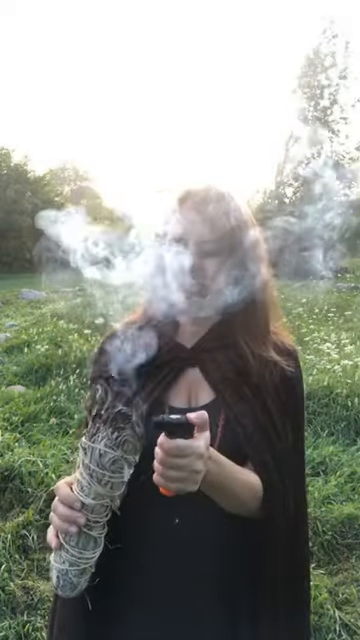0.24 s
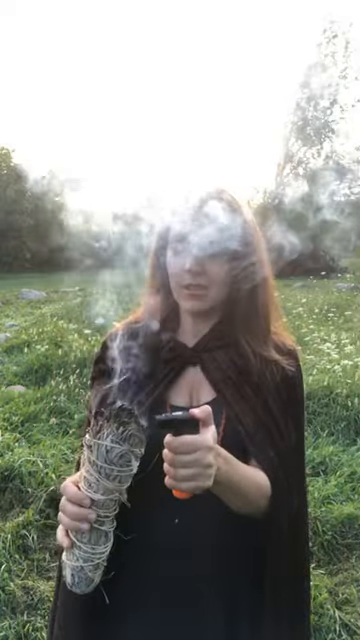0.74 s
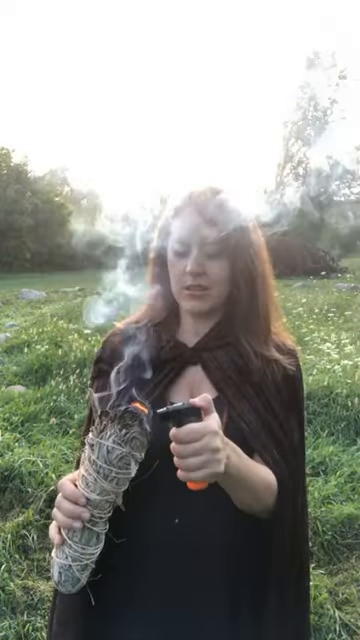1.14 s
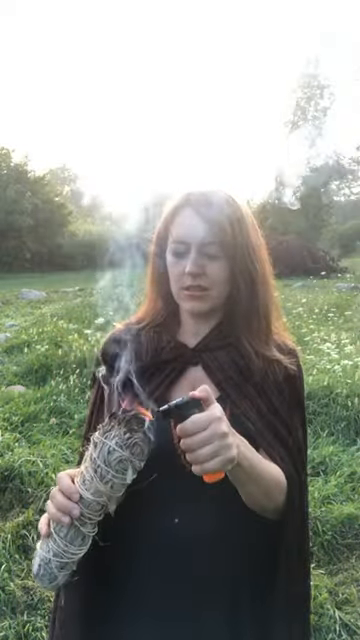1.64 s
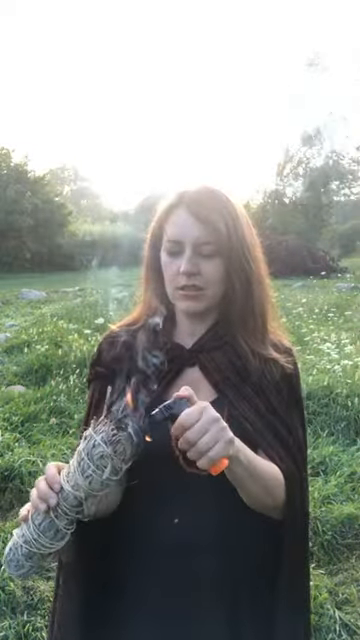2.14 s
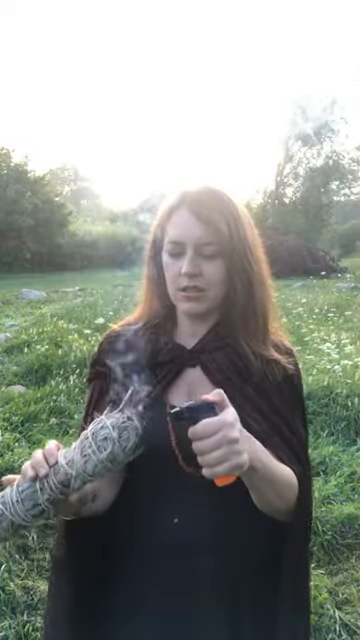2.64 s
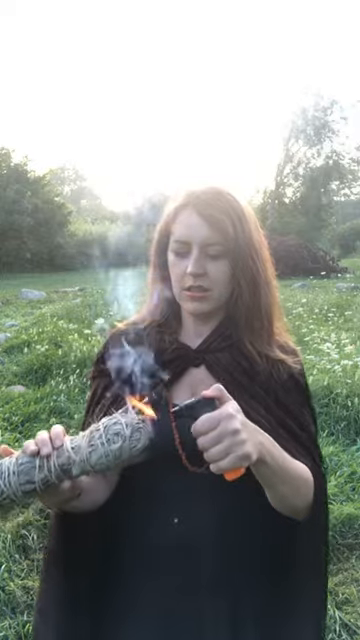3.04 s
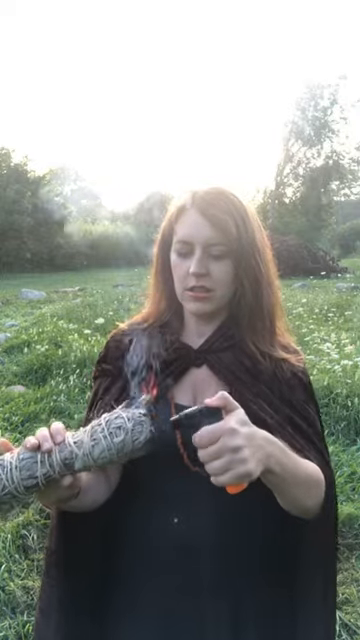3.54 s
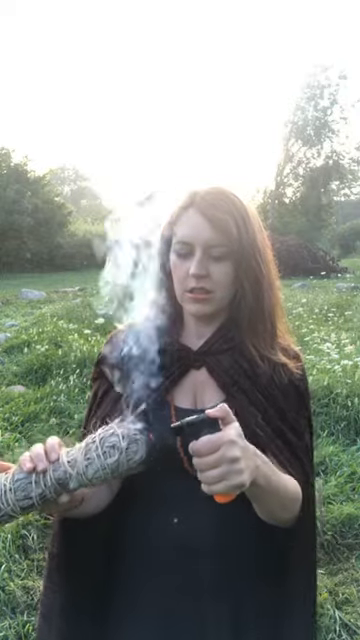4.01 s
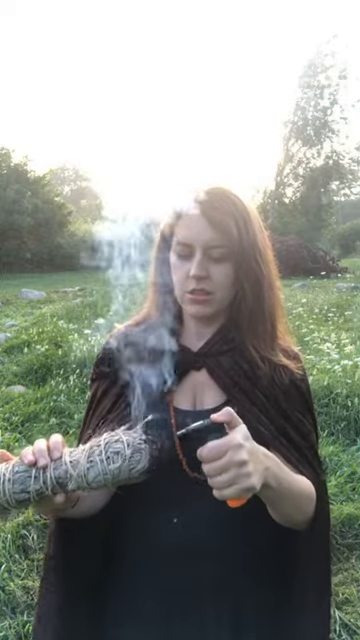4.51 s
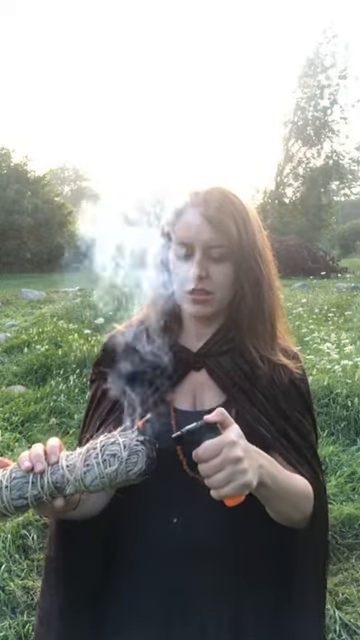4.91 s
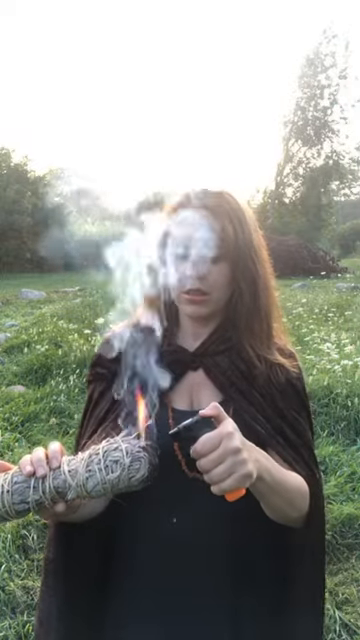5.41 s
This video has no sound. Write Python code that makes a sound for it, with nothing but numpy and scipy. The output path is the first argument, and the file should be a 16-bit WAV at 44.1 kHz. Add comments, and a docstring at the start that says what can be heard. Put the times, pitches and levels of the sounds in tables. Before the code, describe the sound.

In an open meadow, about a metre from a phone microphone, faint gas hisses and a bird chips. A sharp metallic click and tiny pop light a torch, which then roars softly and hisses unsteadily over dry herbs. Stalks crackle briefly; later the bird slurs, whistles and warbles over low distant rumble.

```python
"""A torch lighter is lit in a meadow and held to dried herbs, about a metre from a phone.
A small songbird chips in the trees and unlit gas hisses; the piezo striker snaps and the gas catches with a pop.
Then the turbulent jet flame roars softly, as shaped noise, under its hiss, and cracking stalks ring briefly.
Later the bird's gliding tones turn to slurs, whistles, warbles and sweeps, blurred by leaves and trees.
Faint herb ticks and a low rumble of noise with a distant drone run throughout."""
import sys
import numpy as np
from scipy import signal
from scipy.fft import rfft, irfft, next_fast_len
from scipy.io import wavfile
from scipy.ndimage import uniform_filter1d, map_coordinates

SR = 44100
rng = np.random.default_rng(int(sys.argv[2]) if len(sys.argv) > 2 else 0)


def to_wav(sig):
    """Store sig (one row per channel, or 1-D mono) as 16-bit WAV at the path in sys.argv[1].

    Samples outside -1..1 are clipped; the rate is SR.
    """
    pcm = np.clip(np.atleast_2d(sig), -1, 1) * 32767
    pcm = np.round(pcm).astype(np.int16)
    wavfile.write(sys.argv[1], SR, pcm.T)  # frames by channels


N = 249606
LIGHT_S = .084  # the gas catches

# extra travel time of the echoes off the holder's body and off the ground:
# (time [s], body delay [s], ground delay [s])
ECHO_PATHS = [(0, .00157, .00646), (1.3, .00162, .00646), (2.3, .00178, .00642), (3.4, .00155, .00641),
              (4.5, .0016, .00637), (5.6, .0017, .00635)]


def torch(flutter_db=0.93, spit_db=1.0, unlit_db=-59, roar_db=0.73, gas_db=2.0):
    """Gas hisses from the nozzle; once lit, the turbulent flame adds a soft, fluttering roar."""
    # level of the flame's roar, before roar_db: (time [s], level [dB])
    flame_level = [(0.18, -55), (0.28, -53.5), (0.91, -55), (0.94, -54), (1.55, -54.5), (1.72, -52),
                   (2.11, -55), (4.26, -54), (5.64, -55.5)]
    # level of the gas, before gas_db, an unsteady hiss with a deep dip near 2 s:
    # (time [s], level [dB])
    gas_level = [(0.18, -66), (0.8, -64), (0.94, -66), (1.15, -61.5), (1.32, -60.5), (1.38, -66),
                 (1.59, -66), (1.62, -60.5), (2.06, -74.5), (2.2, -64), (2.57, -57.5), (2.75, -60),
                 (3.86, -58.5), (4.0, -62), (4.03, -59), (4.21, -60), (4.41, -57.5), (4.44, -60),
                 (4.88, -58), (5.02, -63), (5.12, -58.5), (5.41, -60), (5.47, -58), (5.64, -61)]
    # strength of the nozzle's resonance against the hiss, as the torch is turned: (time [s], level [dB])
    nozzle_aim = [(0, -17), (.9, -17), (1.3, -16), (1.7, -21), (2.05, -15), (2.35, -26), (2.65, -14),
                  (3.1, -10.5), (3.5, -15), (3.8, -17), (4.2, -12.5), (5.0, -12), (5.6, -13.5)]
    # spectra of the flame, the burning jet's gas and the unlit gas: (frequency [Hz], density [dB])
    roar_spectrum = [(250, -12.5), (480, -9.5), (640, -2), (790, -0.5), (950, -4.5), (1100, -0.5),
                     (1600, -0.5), (2300, -5), (3100, -10.5), (3800, -10), (5500, -17.5), (7400, -18.5),
                     (9000, -27)]
    hiss_spectrum = [(3500, -8), (5000, -9), (6500, -7), (7600, -7.5), (8900, -16), (10200, -15),
                     (11100, -7.5), (12200, -5.5), (13400, 0.5), (14900, 2.5), (15700, -5)]
    unlit_spectrum = [(4000, -19), (6000, -8), (7100, -5), (8800, -14), (10000, -12), (10800, -3),
                      (11800, -4), (13500, -11), (15500, -13)]

    catch_s = 0.0092
    lit = np.clip((np.arange(N) / SR - LIGHT_S) / catch_s, 0, 1)
    roar_gain = undb(curve(flame_level) + roar_db + flutter_db * walk(35))
    roar = noise(roar_spectrum) * roar_gain
    nozzle = narrow_noise(hz=9570, width_hz=600)
    gas = noise(hiss_spectrum) + undb(curve(nozzle_aim)) * nozzle
    gas = gas * undb(curve(gas_level) + gas_db + spit_db * walk(40))
    unlit = undb(unlit_db) * noise(unlit_spectrum)
    return lit * (roar + gas) + (1 - lit) * unlit


def ignition(db=-38, start_hz=480, end_hz=85, fall_s=0.0048, t60=0.15):
    """The first gas catches with a tiny pop that drops in pitch as the flame swells."""
    t, out = seconds(.15), np.zeros(N)
    hz = end_hz + (start_hz - end_hz) * np.exp(-t / fall_s)
    pop = np.sin(2 * np.pi * np.cumsum(hz) / SR)
    add(out, LIGHT_S, undb(db) * fade(t, t60) * pop)
    return out


def striker(ring_db=-29, scatter_db=-31, scatter_t60=0.068, late_db=-51, late_t60=0.47):
    """The hammer hits the crystal; the head rings and the meadow scatters the snap."""
    # the piezo hammer lands and rebounds: (time [s], relative level [dB], 60 dB decay [s])
    hammer_blows = [(0.0812, -8.5, 0.0041), (0.082, -19, 0.0073)]
    # ring of the lighter's head: (frequency [Hz], relative level [dB], 60 dB decay [s])
    head_modes = [(4770, -4, .025), (5100, 0, .012), (6400, -11, .035), (6500, 10, 0.018), (8300, -3, .03),
                  (9640, 1, .035), (9750, 6, 0.027), (10100, -3, .035), (11200, -4, .025),
                  (11950, -4, .035), (12680, -4, .03), (14150, -2, .02)]
    # colour of a blow, and of its scatter from the grass: (frequency [Hz], relative level [dB])
    snap_spectrum = [(400, -45), (1600, -30), (2300, -7.5), (3600, -3), (4900, 4.5), (5700, -1.5),
                     (6700, 2.5), (8200, -6), (9750, 6), (10900, -3.5), (12400, 2.5), (13400, -7),
                     (14200, 5), (15500, -7)]
    scatter_spectrum = [(500, -5), (2500, -12), (4500, -2.5), (7000, 2), (10000, 4.5), (13000, 3),
                        (16000, -24)]

    lead_s = .003  # each burst begins this long before its peak
    t = seconds(.1)
    blows, rings, ring = np.zeros(N), np.zeros(N), np.zeros(len(t))
    for hz, db, t60 in head_modes:
        ring += undb(db) * fade(t, t60) * np.sin(2 * np.pi * (hz * t + rng.random()))
    for s, db, t60 in hammer_blows:
        add(blows, s - lead_s, undb(db) * burst(t60, lead_s))
        add(rings, s, undb(db + ring_db) * ring)
    # the scatter starts one ground-echo delay after the last blow
    since = np.arange(N) / SR - hammer_blows[-1][0] - ECHO_PATHS[0][2]
    tail = undb(scatter_db) * fade(since, scatter_t60) + undb(late_db) * fade(since, late_t60)
    return 2 * colour(blows, snap_spectrum) + rings + tail * noise(scatter_spectrum)


def burst(t60, lead_s, smooth_hz=300, rise_s=0.0004):
    """A rattle of contacts with an evened spectrum: it peaks about lead_s in, then decays."""
    t = seconds(.1) - lead_s
    rattle = rng.choice([-1., 1.], len(t)) * fade(t, t60)
    spectrum = rfft(rattle)
    power = uniform_filter1d(np.abs(spectrum) ** 2, int(smooth_hz * len(t) / SR))
    evened = irfft(spectrum * np.sqrt(power.mean() / power))
    return evened * np.clip(1 + t / rise_s, 0, 1)


def herbs(rate=14, tick_db=-57, spread_db=3, t60=0.0034):
    """Dry stalks crack in the flame, among faint random ticks of leaf, on average rate per second."""
    # stalks that crack in the heat: (time [s], relative level [dB], pitch [Hz])
    stalk_cracks = [(0.467, -49, 10000), (1.178, -46, 10500), (1.999, -56, 4500), (3.2868, -55, 9000),
                    (3.4938, -57, 9000), (3.542, -38.3, 6500)]

    t, out = seconds(.02), np.zeros(N)
    for s, db, hz in stalk_cracks:
        crack = rng.choice([-1., 1.], len(t)) * fade(t, t60)
        add(out, s, 2 * undb(db) * resonate(crack, hz, width_hz=7400))
    tick_gain = undb(tick_db + spread_db * np.minimum(rng.exponential(size=N), 4))
    ticks = (rng.random(N) < rate / SR) * tick_gain
    return out + colour(ticks, [(1500, -2), (4000, 9), (8000, 11), (14000, -3)])


def reflections(x, body_db=-15, ground_db=-16, tremor_s=4e-5):
    """Body and ground each return a weak copy, a slightly hollow colour; the hand trembles."""
    body_s = curve(ECHO_PATHS, axis=1) + tremor_s * walk(6)
    ground_s = curve(ECHO_PATHS, axis=2) + tremor_s * walk(6)
    return x + undb(body_db) * delayed(x, body_s) + undb(ground_db) * delayed(x, ground_s)


def delayed(x, lag_s):
    """The sound as it arrives over a longer, slowly changing path."""
    return map_coordinates(x, [np.arange(N) - lag_s * SR], order=3)


def songbird(waver=0.014, flicker_db=2, direct_db=-0.7):
    """Gliding whistles, blurred by the leaves around the bird and echoed by the trees beyond."""
    attack_s, release_s = 0.0066, 0.0059
    leaves_db, leaves_t60 = -3, 0.1
    echo_db, echo_t60 = -6, 0.44
    out = np.zeros(N)
    wobble, flicker = walk(500), walk(150)
    for s, hz, db in notes():
        t = np.arange(len(hz)) / SR
        here = max(int(s * SR), 0) + np.arange(len(t))
        edges = np.clip(np.minimum(t / attack_s, t[::-1] / release_s), 0, 1)
        swell = edges * undb(db + flicker_db * flicker[here])
        pitch_hz = hz * (1 + waver * wobble[here])
        add(out, s, swell * np.sin(2 * np.pi * np.cumsum(pitch_hz) / SR))
    t, heard = seconds(.5), undb(direct_db) * out
    for db, t60 in (leaves_db, leaves_t60), (echo_db, echo_t60):
        scatter = rng.standard_normal(len(t)) * fade(t, t60)
        heard = heard + undb(db) * signal.fftconvolve(out, scatter / np.linalg.norm(scatter))[:N]
    return heard


def notes():
    """The bird's five kinds of note, each as (start s, pitch in Hz, level in dB) before waver and flicker."""
    # rising chips: (time [s], length [s], top pitch [Hz], mid-note level [dB])
    chips = [(.002, 0.02, 4750, -53.2), (.105, 0.033, 4750, -57), (.198, .058, 4760, -54),
             (1.93, 0.032, 5430, -60.2), (2.052, .036, 4920, -56.3), (2.157, .048, 4750, -57),
             (2.279, .044, 4790, -56), (2.428, .039, 4870, -56.4), (5.202, .023, 4750, -58.6),
             (5.273, .03, 4870, -54.3), (5.325, .068, 5050, -60.3), (5.407, .029, 4810, -53.8)]
    # falling slurs: (time [s], length [s], start pitch [Hz], level before accents [dB])
    slurs = [(2.88, 0.077, 5910, -54.5), (3.09, .09, 6500, -54), (3.278, .116, 6540, -54),
             (3.492, 0.1, 6570, -53.5)]
    # accents in even steps along a slur: (level [dB])
    slur_accents = [-4, 0, -3, -0.5, -5]
    # level whistles: (time [s], length [s], pitch [Hz], level [dB])
    whistles = [(3.342, 0.044, 5330, -49.5), (3.61, .036, 5160, -60), (3.778, .032, 5470, -54),
                (3.965, .045, 5380, -58), (5.143, .068, 5240, -63.5)]
    # warbles: (time [s], length [s], level before accents [dB])
    warbles = [(3.66, .111, -50.6), (3.834, 0.11, -51.2)]
    # a warble dips and climbs to a loud top, in even steps: (pitch [Hz], accent [dB])
    warble_shape = [(4700, -11), (4150, -3.5), (3550, -3), (3650, -7), (4480, -8), (5060, 2), (5620, 10)]
    # steep falling sweeps: (time [s], length [s], start pitch [Hz], level [dB])
    sweeps = [(4.03, .058, 6600, -55), (4.166, .052, 8500, -56)]

    # every chip climbs at one mean rate, eases off toward its top and swells as it rises
    chip_rise_hz_per_s, chip_ease, chip_swell_db = 18400, 1.5, 5.5
    for s, length, top_hz, db in chips:
        left = 1 - seconds(length) / length
        hz = top_hz - chip_rise_hz_per_s * length * left ** chip_ease
        yield s, hz, db + chip_swell_db * (.5 - left)

    # a slur lingers on a shelf, then drops away
    shelf_hz, slur_end_hz, linger = 5220, 4580, 1.7
    for s, length, start_hz, db in slurs:
        u = 2 * seconds(length) / length - 1
        away_hz = np.where(u < 0, start_hz, slur_end_hz) - shelf_hz
        yield s, shelf_hz + away_hz * np.abs(u) ** linger, db + along(slur_accents, length)

    for s, length, hz, db in whistles:
        yield s, np.full(len(seconds(length)), hz), db
    for s, length, db in warbles:
        hz, accent_db = (along(column, length) for column in np.transpose(warble_shape))
        yield s, hz, db + accent_db

    sweep_end_hz = 4070
    for s, length, start_hz, db in sweeps:
        yield s, np.geomspace(start_hz, sweep_end_hz, len(seconds(length))), db


def along(values, length):
    """Values spread evenly over a note and joined by straight lines."""
    return np.interp(seconds(length), np.linspace(0, length, len(values)), values)


def meadow(db=-52.0, drone_db=-59, swell_db=0.04):
    """Low rumble of the open air, with the drone of far-off traffic as a narrow band of noise."""
    # spectrum of the open meadow: (frequency [Hz], density [dB])
    air_spectrum = [(20, -12), (45, -1.5), (70, -1), (130, -2), (160, -9.5), (195, -11), (250, -19.5),
                    (320, -18.5), (420, -21), (600, -26), (800, -29), (1400, -31.5), (4000, -31),
                    (9000, -41.5), (15500, -41)]

    rumble = noise(air_spectrum) * undb(db + swell_db * walk(2.85))
    return rumble + undb(drone_db) * narrow_noise(hz=118, width_hz=26)


def undb(db):
    """Decibels to gain."""
    return 10 ** (np.asarray(db) / 20)


def unit(x):
    """Scale to rms 1."""
    return x / np.sqrt(np.mean(x ** 2) + 1e-24)


def seconds(length):
    """A time axis of the given length."""
    return np.arange(int(length * SR)) / SR


def fade(t, t60):
    """Exponential decay that starts at t = 0 and falls 60 dB in t60 seconds."""
    return (t >= 0) * np.exp(-np.log(1000) * np.maximum(t, 0) / t60)


def curve(rows, axis=1):
    """One column of a table, joined by straight lines in time."""
    rows = np.array(rows)
    return np.interp(np.arange(N) / SR, rows[:, 0], rows[:, axis])


def colour(x, points):
    """Filter by a (Hz, dB) spectrum, causally (minimum phase), so that attacks stay sharp."""
    hz, db = np.transpose(points)
    size = next_fast_len(len(x) + SR // 2, True) // 2 * 2
    f = np.maximum(np.arange(size // 2 + 1) * SR / size, 1)
    # beyond the end points the gain falls with the square of frequency
    outside = np.maximum(np.log(hz[0] / f), 0) + np.maximum(np.log(f / hz[-1]), 0)
    log_gain = np.log(undb(np.interp(np.log(f), np.log(hz), db))) - 2 * outside
    # folding the cepstrum forward in time gives the causal phase
    cepstrum = irfft(log_gain)
    cepstrum[1:size // 2] *= 2
    cepstrum[size // 2 + 1:] = 0
    return irfft(rfft(x, size) * np.exp(rfft(cepstrum)))[:len(x)]


def noise(points):
    """Noise of a given spectrum, rms 1."""
    return unit(colour(rng.standard_normal(N), points))


def resonate(x, hz, width_hz):
    """One resonance, gain 1 at its centre."""
    b, a = signal.iirpeak(min(hz, SR / 2 - 1), hz / width_hz, fs=SR)
    return signal.lfilter(b, a, x)


def narrow_noise(hz, width_hz):
    """Noise passed twice through one resonance of the given width, rms 1."""
    once = resonate(rng.standard_normal(N), hz, width_hz)
    return unit(resonate(once, hz, width_hz))


def walk(rate):
    """Random levels held 1 / rate s and smoothed twice, rms 1."""
    k = int(SR / rate)
    steps = np.repeat(rng.standard_normal(N // k + 1), k)
    return unit(uniform_filter1d(uniform_filter1d(steps, k), k)[:N])


def add(out, s, x):
    """Mix x into out at time s."""
    i = max(int(s * SR), 0)
    out[i:i + len(x)] += x[:N - i]


def scene():
    """Torch, herbs, bird and meadow reach one microphone, the same in both channels."""
    near = striker() + ignition() + torch() + herbs()
    mono = reflections(near) + songbird() + meadow()
    return np.array([mono, mono])


def record(dry):
    """The phone cuts the top, with a steep elliptic low-pass."""
    top_hz = 15750
    low_pass = signal.ellip(10, .2, 80, top_hz, fs=SR, output="sos")
    return signal.sosfilt(low_pass, dry)


dry = scene()
out = record(dry)
to_wav(out)
```